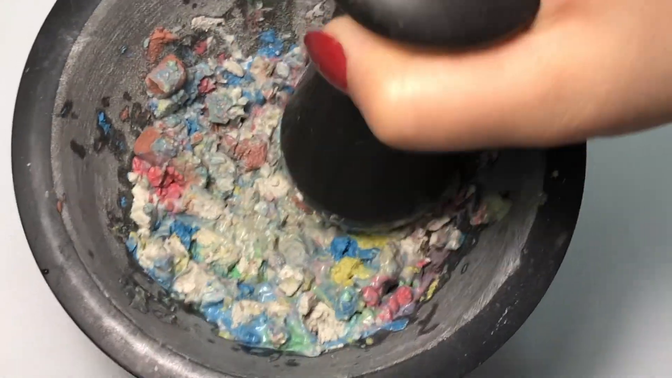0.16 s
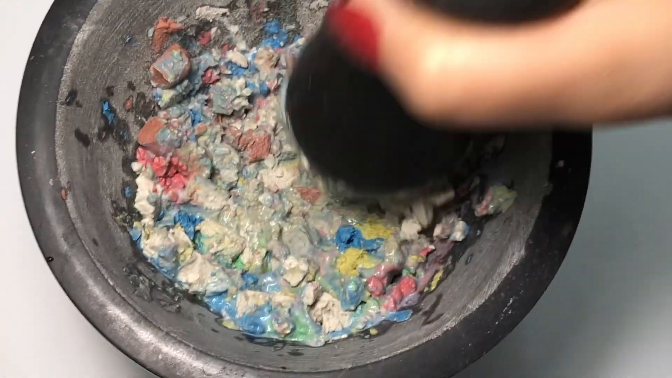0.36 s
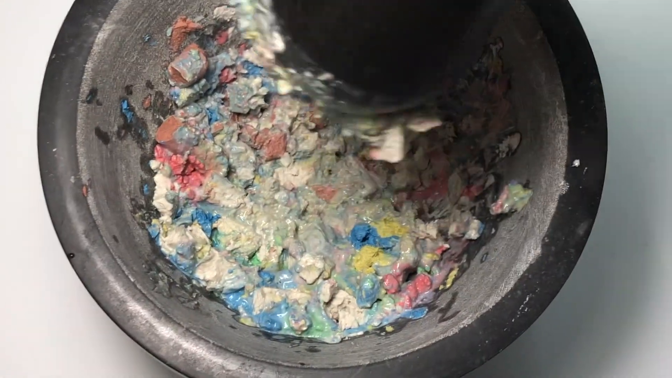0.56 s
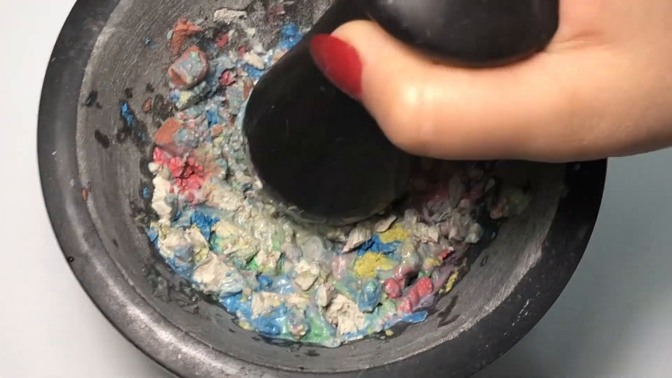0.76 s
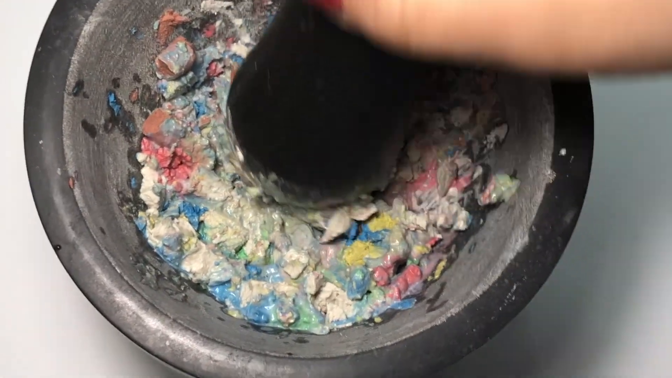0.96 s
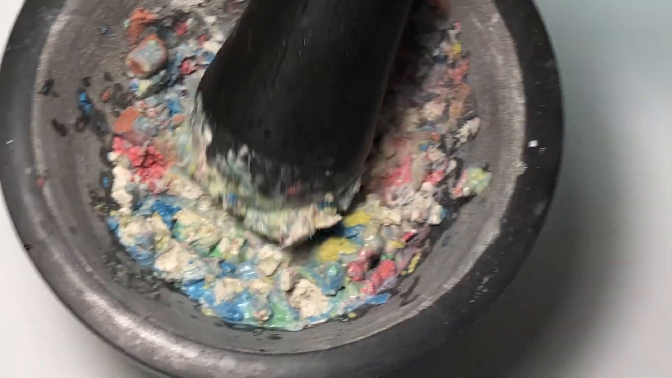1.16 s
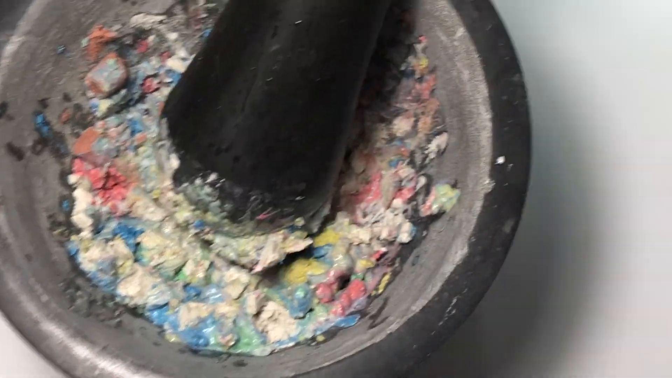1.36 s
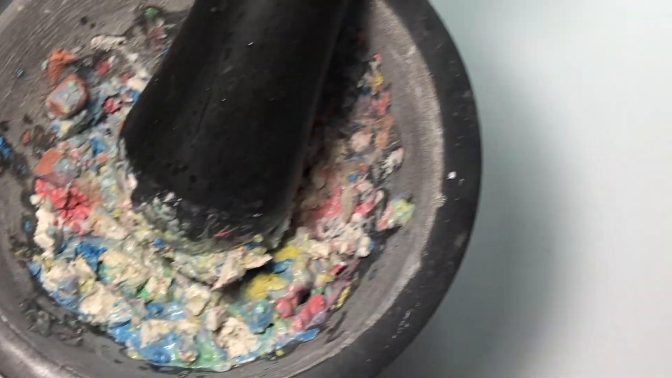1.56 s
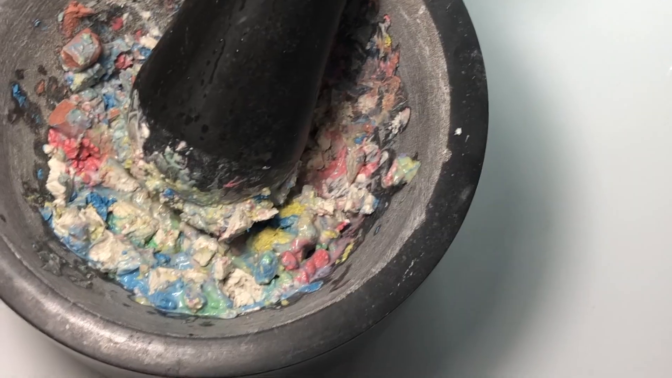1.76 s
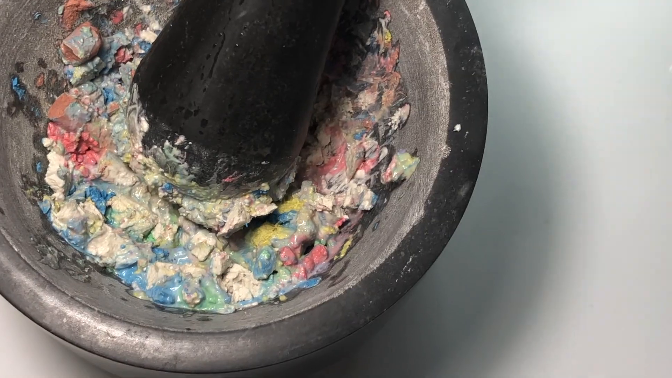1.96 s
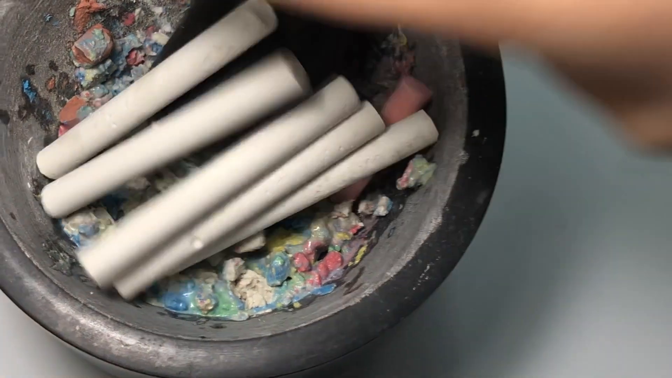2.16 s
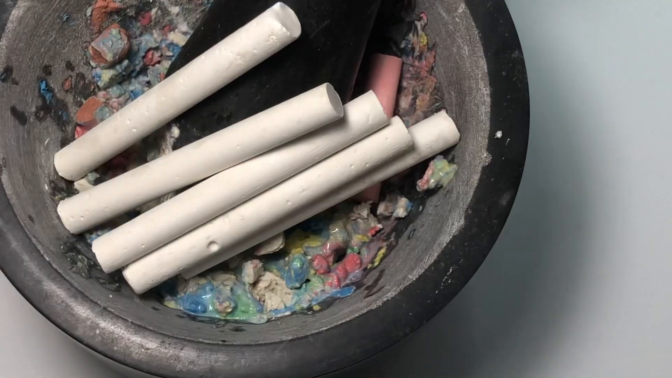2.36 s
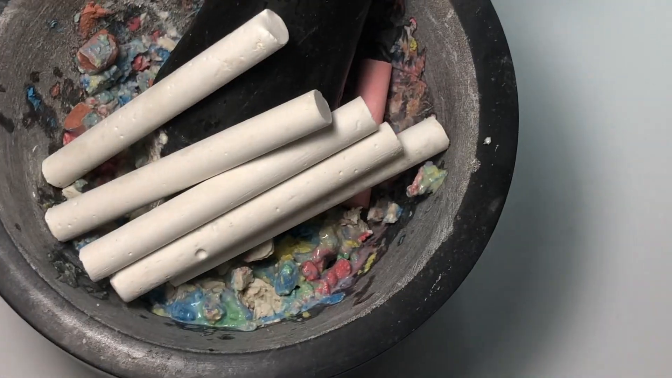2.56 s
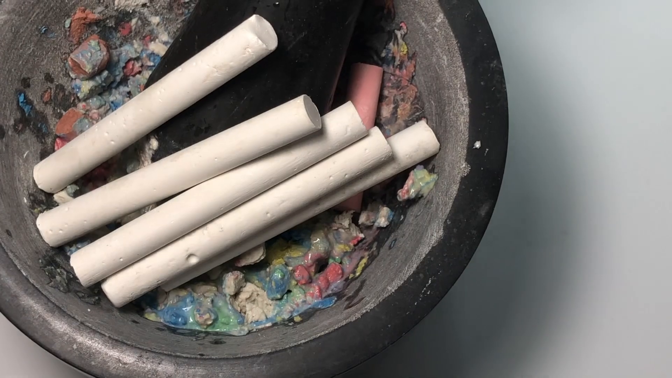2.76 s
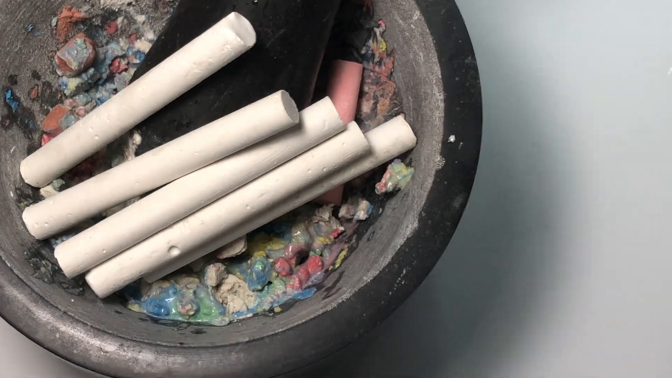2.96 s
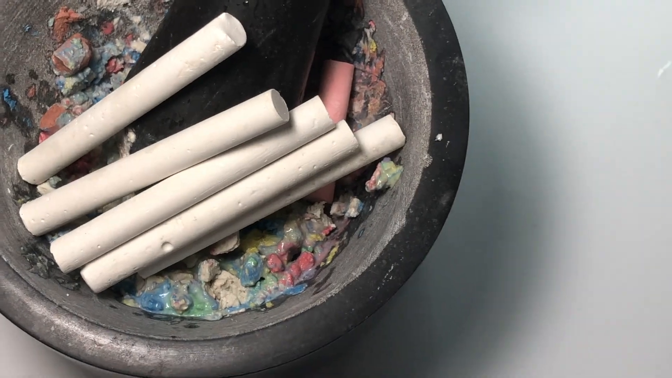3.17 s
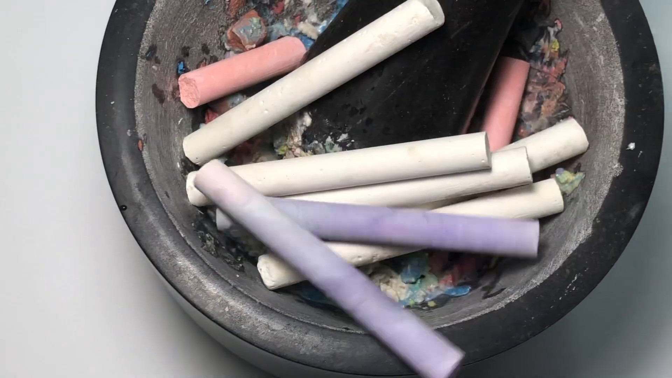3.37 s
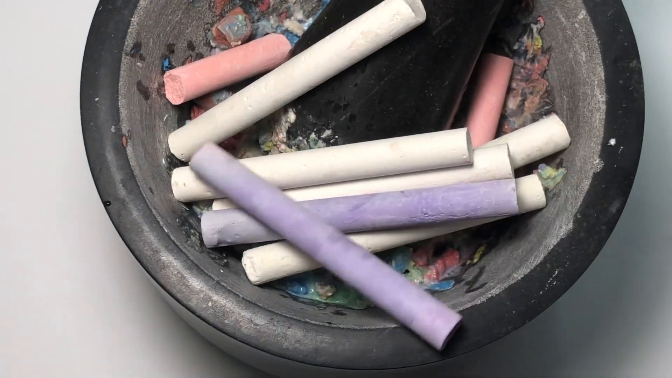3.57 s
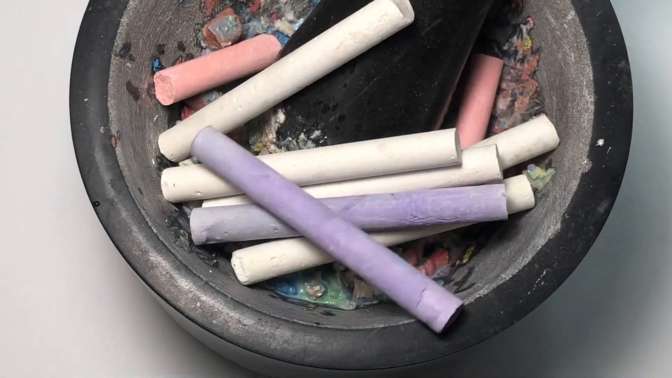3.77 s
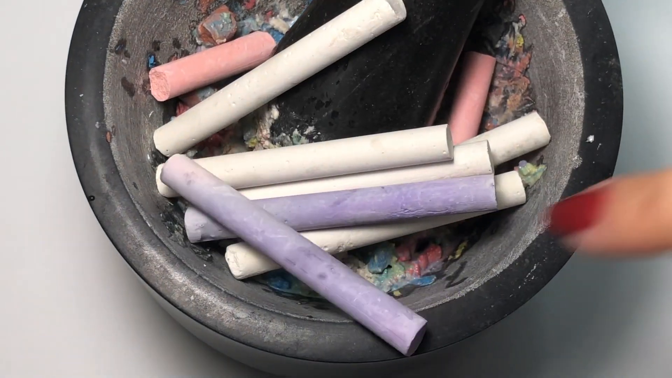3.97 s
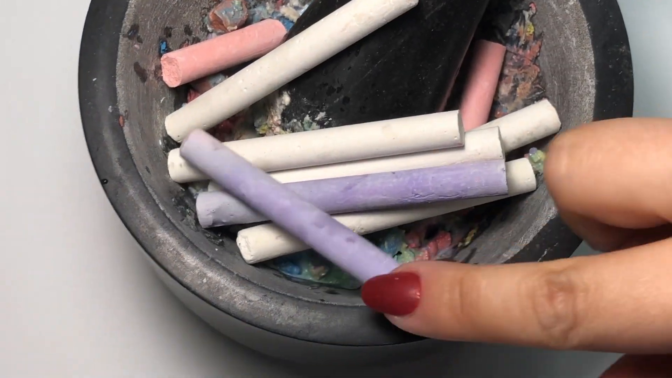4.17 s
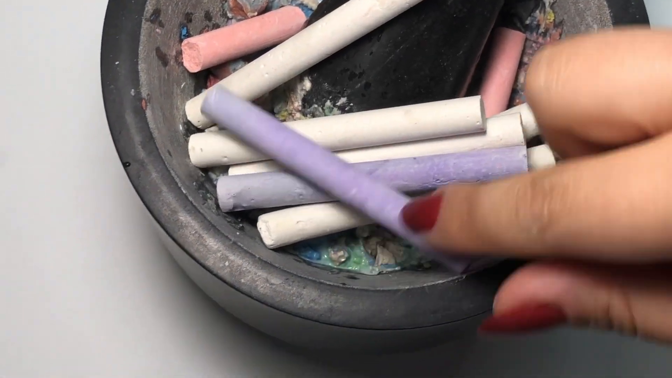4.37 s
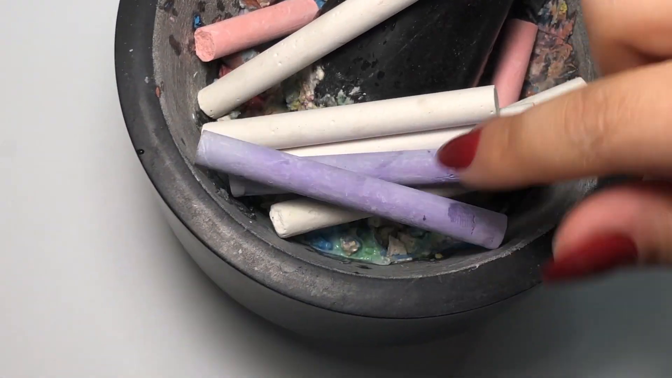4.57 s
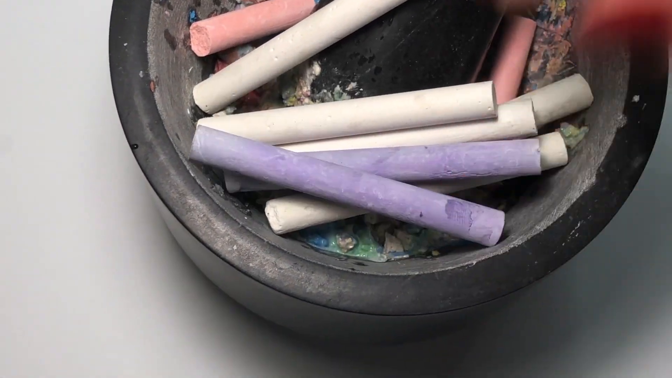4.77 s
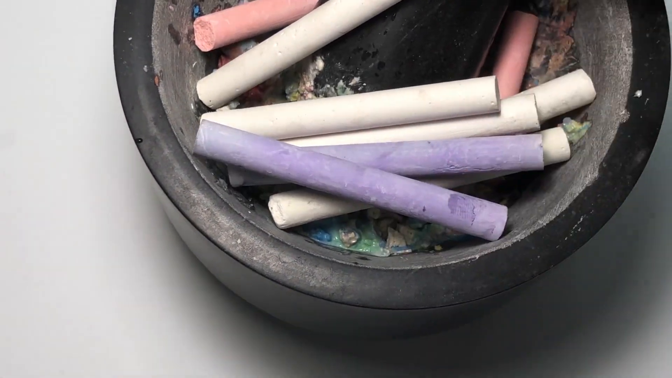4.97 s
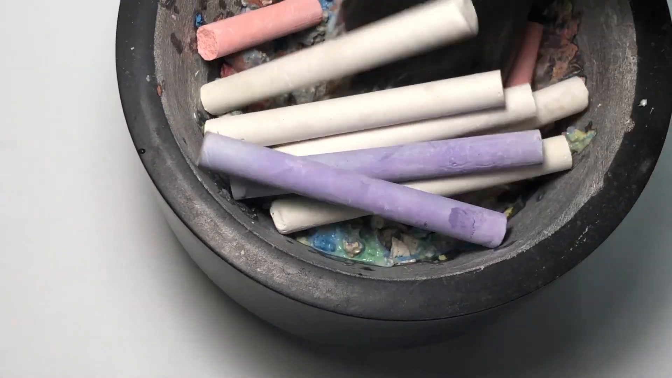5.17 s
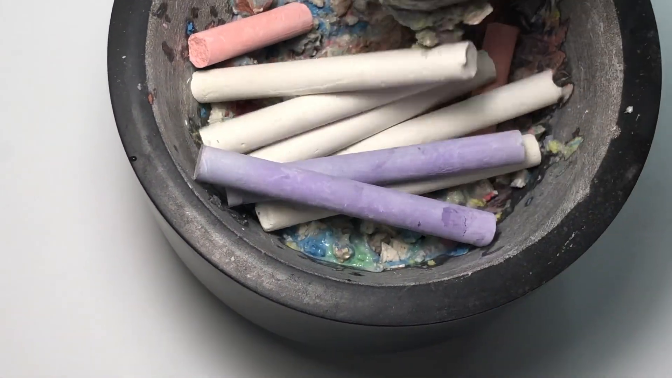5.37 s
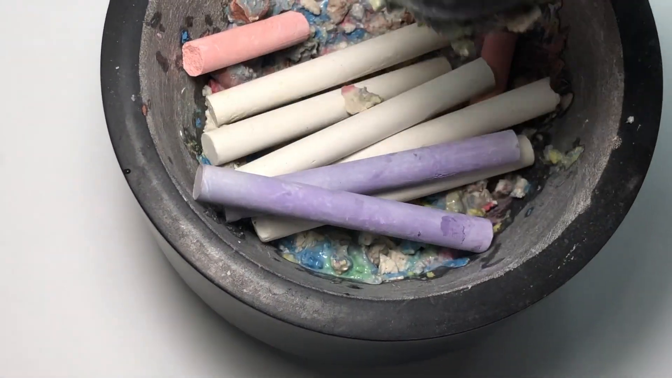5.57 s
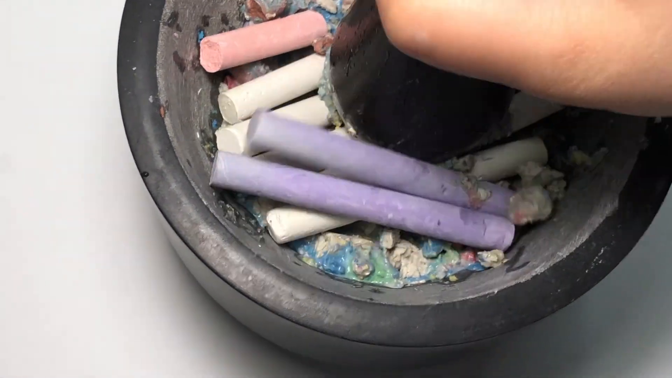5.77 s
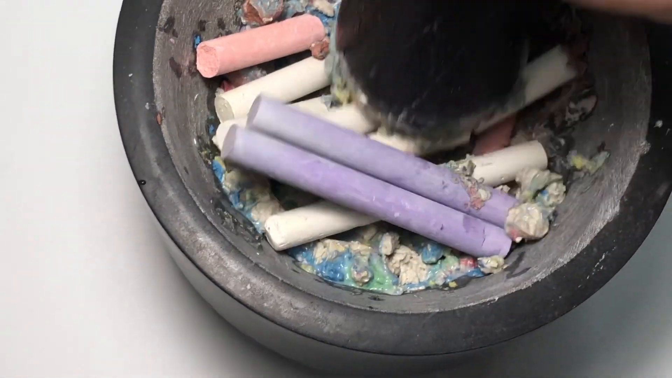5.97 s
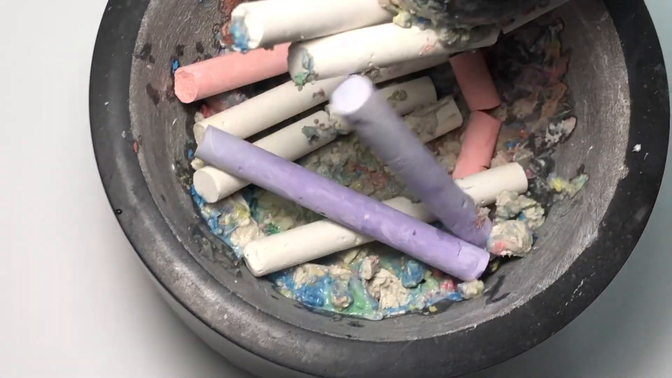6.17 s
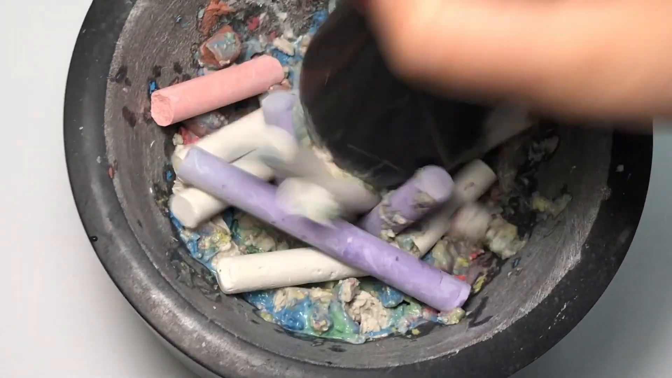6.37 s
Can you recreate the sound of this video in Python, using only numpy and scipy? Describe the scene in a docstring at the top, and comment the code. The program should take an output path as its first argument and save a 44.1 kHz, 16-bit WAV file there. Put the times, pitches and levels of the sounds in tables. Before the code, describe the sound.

Booming pestle blows with chalk crunch, a ringing stone bounce, a quiet spell of clinking and sliding chalk sticks, then two heavy crunching blows.

```python
"""A booming blow, then another: a stone pestle pounds chalk in a stone mortar on a table, close by in
a small room. The blows sway and knock the table as decaying modes; chalk cracks as bursts of grains.
The third blow lands on bare stone and bounces, and the stone modes ring. Fresh sticks drop in, clink
as free bars and slide as filtered friction noise, and are pounded in turn. Air and a low rumble lie beneath."""
import sys
import numpy as np
from scipy import signal
from scipy.fft import rfft, irfft
from scipy.io import wavfile

SR = 44100
rng = np.random.default_rng(int(sys.argv[2]) if len(sys.argv) > 2 else 0)


def put_to_file(sound):
    """Save the sound as 16-bit audio at rate SR, in the file named by the first command-line argument."""
    columns = np.atleast_2d(sound).T  # one column per channel
    safe = np.clip(columns, -1, 1)
    whole_steps = np.round(safe * 32767)
    wavfile.write(sys.argv[1], SR, whole_steps.astype(np.int16))


N = 283563
RING_TIME = np.arange(SR // 3) / SR  # time axis of one struck sound, seconds

# Still air of the place. Each row: frequency in Hz, relative density in dB per Hz.
AIR = [(20, -10.5), (70, -21), (120, -14), (180, -23.5), (400, -25.5), (1000, -32.5), (2500, -37.5),
       (16000, -42.5)]
AIR_DB = -60

# Low rumble: steady level, and a swell round each blow (1/e half width, level against the blow).
RUMBLE_DB, WAFT_S, WAFT_DB = -52, .11, -49.5
# A gentle bump in the deep bass. Each row: start in seconds, length in seconds, peak level in dB.
BUMPS = [(2.85, .16, -40)]

# Pestle blows. Each row: start in seconds, relative level in dB, contact time in seconds,
# level of the higher table modes against the blow in dB.
BLOWS = [(.0880, 0, 0.0027, 5.5), (0.6864, 2, 0.0032, -2), (1.094, -3, 0.0031, 8.5),
         (5.7059, 7, 0.0071, 5.5), (6.3797, 4, 0.0045, 8.5)]
# The table's main sway: settled pitch, decay, and time to build.
BOOM_HZ, BOOM_T60_S, BOOM_SWELL_S = 121.18, 0.15, .042
# Higher modes of the table. Each row: frequency in Hz, relative level in dB, t60 in seconds.
TABLE_MODES = [(62.6, -23, 0.067), (187.3, -16.5, 0.078), (227.6, -12.5, 0.12), (277.5, -20.5, 0.14),
               (315, -17, 0.12), (401, -9.5, .075), (445, -11, 0.049), (489, -25.5, 0.3), (582, -23, 0.15),
               (661, -21.5, 0.15), (830, -26, 0.26)]
# Chalk or a stick pitched here moves the table at its listed level; lower pieces are heavier, move it more.
LANDING_HZ = 1913
# Blurred small modes of table and bowl. Each row: frequency in Hz, relative density in dB per Hz.
THUMP = [(150, -12), (230, -6), (400, -4.5), (600, -7), (900, -9), (1300, -12.5), (2200, -21), (6000, -45)]

# Chalk cracking under the pestle. Each row: start in seconds, relative level in dB, fragment pitch in Hz.
CRACKS = [(.0885, -31, 6760), (.0920, -14.5, 4060), (.0965, -30, 4460), (.6835, -31, 2890),
          (.6878, -12, 3700), (.6906, -16.5, 8540), (.6975, -18, 1160), (5.6907, -25, 3000),
          (5.6972, -7, 3350), (5.7032, -7, 5200), (5.7062, -1.5, 6140), (5.7132, -20.5, 5770),
          (6.3548, -11.5, 7530), (6.3607, -38, 9000), (6.3648, -7, 8300), (6.3723, -6.5, 5000),
          (6.3812, -10, 3660)]
# Decay of every crack, and the share (0-1) that rings at the fragment's pitch.
CRACK_T60_S, CRACK_RINGS = 0.019, .55
# Clearest ticks of crumbs and chips. Each row: start in seconds, relative level in dB, fragment pitch in Hz.
CRUMBS = [(.2445, -43, 5640), (.287, -41, 3500), (.3065, -32, 4200), (.3375, -35.5, 9000),
          (.874, -43.5, 4600), (.8997, -36, 3800), (.927, -35.5, 5470), (.932, -32.5, 8300),
          (.941, -30.5, 4900), (.9735, -30.5, 3870), (2.838, -48, 1470), (2.878, -36, 1410),
          (5.298, -43, 1790), (5.8188, -29, 4700), (5.935, -43.5, 3200), (6.286, -44, 1750)]
CRUMB_T60_S, CRUMB_RINGS = 0.011, 0.53
# Finer crumbs shed as the pestle lifts: wait after the blow, length, loudest level, middle pitch.
LIFT_AFTER_S, SHED_S, SHED_DB, SHED_HZ = 0.2, 0.2, -47.5, 4900
# Crushed chalk. Each row: frequency in Hz, relative density in dB per Hz.
CRUNCH = [(200, 0), (600, -3.5), (1000, -4), (1350, 6), (2300, -5), (4500, -3.5), (7500, -3.5), (9500, -10),
          (15500, -21.5)]
# Small, hard contacts. Each row: frequency in Hz, relative density in dB per Hz.
CONTACT = [(200, -19), (700, -18), (1050, -7.5), (1300, 4.5), (2400, -3), (4500, -2.5), (7500, -5),
           (10000, -9), (15500, -17.5)]

# Dry scraping: the pestle scrapes at first, later chalk slides on chalk. Each row: start in seconds, length in
# seconds, relative peak level in dB.
SLIDES = [(.93, 0.42, -61.5), (1.68, 0.46, -67.5), (1.97, 0.071, -56.5), (2.83, 0.044, -55.5),
          (2.87, 0.091, -49.5), (2.97, 0.31, -53.5), (4.31, 0.14, -58.5), (5.06, 0.17, -51.5),
          (5.97, 0.12, -61.5)]
# A stick rolling over the others. Each row: start in seconds, length in seconds, peak level in dB.
ROLLS = [(3.38, 0.57, -65.5)]
STROKE_SKEW = 0.68  # below 1, a stroke peaks before its middle
# Sliding friction. Each row: frequency in Hz, relative density in dB per Hz.
RUB = [(400, -17), (900, -3), (1400, 4.5), (2300, -1.5), (3300, 1), (6000, -1.5), (9500, -7.5),
       (15000, -18)]
# Rolling. Each row: frequency in Hz, relative density in dB per Hz.
ROLL = [(150, -19), (330, 0.5), (700, -4), (1100, -21), (3000, -32), (10000, -32)]

# Pestle bouncing on bare stone. Each row: start in seconds, relative level in dB.
STONE_HITS = [(1.0955, 0), (1.1014, -5), (1.1081, -2), (1.1136, -10), (1.1172, -15)]
# Modes of mortar and pestle. Each row: frequency in Hz, relative level in dB, t60 in seconds.
STONE_MODES = [(1034, -22, 0.08), (1240, -18.5, .07), (1397, -13, 0.078), (1500, -16, 0.057),
               (1632, -16, .09), (1814, -18, 0.08), (1967, -15.5, 0.054), (2053, -14, .045),
               (2270, -20.5, .1), (2394, -18, .07), (2676, -27.5, .1), (4789, -17, 0.14),
               (8398, -30.5, 0.065)]
# The bowl jolts on the table at each bounce.
JOLT_HZ, JOLT_T60_S = 398, .08

# Sticks clinking, and a few chips of chalk ticking with a brief ring (3.449 s, 5.361 s). Each row: start in
# seconds, relative level in dB, lowest bending mode in Hz, # overtone level against that mode in dB, t60 in
# seconds.
CLINKS = [(2.011, -35.5, 2860, -2, 0.082), (2.074, -27, 2850, 7, 0.16), (2.0863, -15.5, 2690, 23, 0.075),
          (2.091, -10, 2790, 12.5, 0.087), (2.114, -13.5, 2532, 27, 0.082), (2.168, -20, 2870, 10, 0.037),
          (2.1998, -20.5, 2877, 6.5, 0.094), (2.226, -29, 2770, 0, 0.029), (3.388, -34, 1987, 5.5, 0.032),
          (3.436, -42, 2268, -12, .1), (3.449, -31.5, 2087, 2, 0.0087), (4.5243, -22, 2244, 9, 0.04),
          (5.2089, -15.5, 2640, -1, .08), (5.311, -31, 2720, 0, .045), (5.361, -31, 2800, 6, .008),
          (5.398, -31, 2800, 12.5, .035), (5.4908, -21.5, 2610, -5, .075), (6.1005, -28, 2316, 14, .045),
          (6.195, -42, 2255, -1.5, 0.021), (6.308, -31, 1953, -4.5, 0.032)]
# Bending modes of a stick. Each row: ratio to the lowest mode, exponent of flattening with pitch.
BAR = [(1, 0), (2.618, .15), (4.81, .1)]
BAR_HZ = 2616  # the ratios hold for a stick of this pitch
# A stick falls back and touches once more: longest wait, level against the first touch.
REBOUND_S, REBOUND_DB = 0.022, -19.5
# The dropped handful: start, strongest level, time at full strength, time to settle, change while settling.
DROP_S, DROP_DB, DROP_HOLD_S, SETTLE_S, SETTLE_DB = 2.092, -11.5, .035, .09, -27
# Range of the lowest mode among the sticks of the handful.
SHORTEST_HZ, LONGEST_HZ = 2980, 2550
# Dull knocks of chalk landing and being handled. Each row: start in seconds, relative level in dB, pitch in Hz.
KNOCKS = [(2.098, -27.5, 1534), (2.122, -26, 1700), (2.153, -28.5, 1540), (3.2972, -31, 1540),
          (3.3033, -14.5, 3130), (3.332, -19, 6700), (3.9798, -28, 4677), (3.9976, -29, 4700)]
KNOCK_T60_S, KNOCK_RINGS = 0.06, 0.46
# Dull knocking. Each row: frequency in Hz, relative density in dB per Hz.
DULL = [(150, -23), (400, 2.5), (800, -6), (1400, 0), (4000, -7.5), (7500, -10), (9500, -18.5),
        (15500, -27)]

# Decay of the small room. Each row: frequency in Hz, t60 in seconds.
ROOM_T60 = [(150, 0.067), (500, 0.31), (1500, 0.2), (4000, .25), (8000, 0.07), (15000, 0.31)]
BOWL_REFLECTS_HZ = 700  # the bowl is small and mainly reflects sound above this
CUTOFF_HZ = 16400


def from_db(db):
    """Decibels to gain."""
    return 10 ** (np.asarray(db) / 20)


def rms_one(x):
    """Scale to rms 1."""
    return x / np.sqrt(np.mean(x ** 2) + 1e-20)


def at_hz(points, hz):
    """Read a table on a log-frequency axis."""
    f, value = np.transpose(points)
    return np.interp(np.log(np.maximum(hz, 1)), np.log(f), value)


def add(track, s, sound):
    """Mix a sound into a track at a time in seconds."""
    start = int(round(s * SR))
    track[start:start + len(sound)] += sound[:N - start]


def noise():
    """White noise as long as one struck sound."""
    return rng.standard_normal(len(RING_TIME))


def fade(t60):
    """A free decay, 60 dB down after t60 seconds."""
    return np.exp(-np.log(1000) * RING_TIME / t60)


def rise(seconds):
    """A smooth onset from 0 towards 1."""
    return 1 - np.exp(-(RING_TIME / seconds) ** 2)


def ring(hz, t60):
    """One struck mode: a dying sine that starts from rest position."""
    return np.sin(2 * np.pi * hz * RING_TIME) * fade(t60)


def butterworth(x, edges_hz, kind):
    """Second-order Butterworth filter."""
    return signal.sosfilt(signal.butter(2, edges_hz, kind, fs=SR, output="sos"), x)


def colour(x, spectrum, size=8192):
    """Causal (minimum-phase) filter with this spectrum; white noise keeps its power."""
    hz = np.arange(size // 2 + 1) * SR / size
    gain = rms_one(from_db(at_hz(spectrum, hz)))
    # folding the cepstrum onto positive times makes the filter minimum-phase
    cepstrum = irfft(np.log(gain))[:size // 2]
    cepstrum[1:] *= 2
    impulse = irfft(np.exp(rfft(cepstrum, size)))
    return signal.fftconvolve(x, impulse)[:len(x)]


def resonate(x, hz, width_hz):
    """A broad two-pole resonance; white noise keeps its power."""
    r = np.exp(-np.pi * width_hz / SR)
    zeros = np.sqrt((1 - r * r) / 2) * np.array([1, 0, -1])
    poles = [1, -2 * r * np.cos(2 * np.pi * hz / SR), r * r]
    return signal.lfilter(zeros, poles, x + 1e-18)


def grains(per_s, spread_db, size):
    """Tiny fractures of uneven strength at random moments; rms 1."""
    sign = rng.choice([-1, 1], size)
    strength = from_db(spread_db * np.minimum(rng.exponential(1, size), 4)) * sign
    happens = rng.random(size) < per_s / SR
    return rms_one(strength * happens)


def bursts(rows, spectrum, t60, share, width, per_s, spread_db):
    """Each event is a dying avalanche of grains, partly ringing at the pitch of its fragment."""
    out = np.zeros(N)
    for s, db, hz in rows:
        burst = grains(per_s, spread_db, size=len(RING_TIME)) * fade(t60)
        ringing = resonate(burst, hz, width * hz)
        add(out, s, from_db(db) * ((1 - share) * burst + share * ringing))
    return colour(out, spectrum)


def swells(rows):
    """Strokes that swell and fade: a level over the whole scene."""
    level, time = np.zeros(N), np.arange(N) / SR
    for s, length, db in rows:
        progress = np.clip((time - s) / length, 0, 1)
        level += from_db(db) * np.sin(np.pi * progress ** STROKE_SKEW)
    return level


def still_air():
    """Steady noise of the quiet place, weighted to the bass."""
    return from_db(AIR_DB) * rms_one(colour(rng.standard_normal(N), AIR))


def rumble():
    """Deep noise that swells round each blow and at a gentle bump."""
    time = np.arange(N) / SR
    wafts = sum(from_db(db + WAFT_DB) * np.exp(-((time - s) / WAFT_S) ** 2) for s, db, *_ in BLOWS)
    low = butterworth(rng.standard_normal(N), [12, 34], "band")
    return (from_db(RUMBLE_DB) + wafts + swells(BUMPS)) * rms_one(low)


def table(boom_db=13.0, first_swing=0.15, sag=0.14, sag_s=0.01, nudge_db=-7.5):
    """The mortar drives the table into a sway and higher modes; a longer contact mutes the higher modes."""
    boom, knock = np.zeros(N), np.zeros(N)
    # the sway starts flat under the weight of the blow, and builds as the whole top joins in
    pitch = BOOM_HZ * (1 - sag * np.exp(-RING_TIME / sag_s))
    swell = first_swing + (1 - first_swing) * rise(BOOM_SWELL_S)
    sway = -swell * fade(BOOM_T60_S) * np.sin(2 * np.pi * np.cumsum(pitch) / SR)
    for s, db, contact, upper_db in BLOWS:
        add(boom, s, from_db(db + boom_db) * rise(contact) * sway)
        for k, (hz, mode_db, t60) in enumerate(TABLE_MODES):
            softness = 1 / np.sqrt(1 + (hz * contact) ** 4)
            height = (-1) ** k * from_db(db + upper_db + mode_db) * softness
            add(knock, s, height * rise(contact) * ring(hz, t60))
    # even a falling stick nudges the table
    for s, db, hz, *_ in CLINKS + KNOCKS:
        add(boom, s, from_db(db + nudge_db) * LANDING_HZ / hz * sway)
    return boom, knock


def thump(thump_db=-14.0, thump_t60=0.073, contact_s=0.0033, landing_db=-16.0):
    """Many small modes of table and bowl blur into a short, dull noise; a hard contact drives them most."""
    out = np.zeros(N)
    for s, db, contact, upper_db in BLOWS:
        force = from_db(db + upper_db + thump_db) / np.hypot(1, contact / contact_s) ** 2
        add(out, s, force * noise() * rise(contact) * fade(thump_t60))
    # landing chalk thumps lightly
    for s, db, hz in KNOCKS:
        force = from_db(db + landing_db) * (LANDING_HZ / hz) ** 2
        add(out, s, force * noise() * rise(contact_s) * fade(thump_t60))
    return colour(out, THUMP)


def shed_crumbs(spread_db=9.0, count=6):
    """Fine crumbs fall as the pestle lifts for a blow that follows within a second; rows as for CRUMBS."""
    lifts = [blow[0] for blow, following in zip(BLOWS, BLOWS[1:]) if following[0] - blow[0] < 1]
    rows = []
    for s in lifts:
        for when, small in rng.random((count, 2)):
            start = s + LIFT_AFTER_S + SHED_S * when
            # smaller crumbs are quieter and higher
            rows.append((start, SHED_DB - spread_db * small, SHED_HZ * 2 ** (small - .5)))
    return rows


def crushing(powder_db=-35.0, powder_t60=0.19):
    """Chalk cracks, the powder grinds on briefly under the pestle, and crumbs fall as it lifts."""
    cracks = bursts(CRACKS, CRUNCH, CRACK_T60_S, CRACK_RINGS, width=.55, per_s=22000, spread_db=1.6)
    ticks = CRUMBS + shed_crumbs()
    crumbs = bursts(ticks, CONTACT, CRUMB_T60_S, CRUMB_RINGS, width=.5, per_s=28000, spread_db=1.2)
    powder = np.zeros(N)
    for s, db, *_ in BLOWS:
        grit = grains(1500, 4.5, size=len(RING_TIME))
        add(powder, s, from_db(db + powder_db) * grit * fade(powder_t60))
    return cracks + crumbs + colour(powder, CRUNCH)


def sliding(rub_db=-1.5, sing_db=-14.0, sway_db=-4.5, uneven_db=2.5, count=450):
    """Dry friction catches and slips: it hisses, makes sticks sing faintly, stirs the table; rolling is duller."""
    time = np.arange(N) / SR
    catching = np.interp(time, np.linspace(0, time[-1], count), rng.standard_normal(count))
    friction = grains(4000, 3.5, size=N) * from_db(uneven_db * catching)
    song = rms_one(sum(resonate(friction, hz, 160) for hz in (2860, 6100, 7450)))
    sway = rms_one(resonate(resonate(friction, BOOM_HZ, 30), BOOM_HZ, 30))
    hiss = from_db(rub_db) * colour(friction, RUB)
    slide = hiss + from_db(sing_db) * song + from_db(sway_db) * sway
    return swells(SLIDES) * slide + swells(ROLLS) * colour(friction, ROLL)


def bare_stone(clack_db=4.0, clack_hz=1700, clack_t60=0.01, grit_db=-25.5, grit_t60=0.003, jolt_db=-11.5):
    """Stone on stone: each bounce gives a hard, gritty clack and a jolt of the bowl, and both bodies ring."""
    out, grit = np.zeros(N), np.zeros(N)
    for s, db in STONE_HITS:
        clack = from_db(db + clack_db) * ring(clack_hz, clack_t60)
        jolt = from_db(db + jolt_db) * ring(JOLT_HZ, JOLT_T60_S)
        add(out, s, clack - jolt)
        add(grit, s, from_db(db + grit_db) * noise() * fade(grit_t60))
    # the first, hardest contact sets the modes going
    first_s = STONE_HITS[0][0]
    for k, (hz, mode_db, t60) in enumerate(STONE_MODES):
        add(out, first_s, (-1) ** k * from_db(mode_db) * ring(hz, t60))
    return out + colour(grit, CONTACT)


def rebounds():
    """The light second touch after each clink; rows as for CLINKS."""
    waits = REBOUND_S * rng.uniform(.2, 1, len(CLINKS))
    return [(s + wait, db + REBOUND_DB, *stick) for (s, db, *stick), wait in zip(CLINKS, waits)]


def rattle(count=24, overtone_db=9.0, spread_db=10.5, t60=0.045):
    """Many light touches between the dropped sticks, at pitches within their range; rows as for CLINKS."""
    jitter, pitch, weak = rng.random((count, 3)).T
    after = (np.arange(count) + jitter) / count * (DROP_HOLD_S + SETTLE_S)
    settled = np.maximum(after - DROP_HOLD_S, 0) / SETTLE_S
    levels = DROP_DB + SETTLE_DB * settled - spread_db * weak
    stick_hz = LONGEST_HZ + (SHORTEST_HZ - LONGEST_HZ) * pitch
    return [(DROP_S + t, db, hz, overtone_db, t60) for t, db, hz in zip(after, levels, stick_hz)]


def sticks(click_t60=0.0082, click_db=-2.0, knock_db=-1.0, top_mode_db=-14.5, split=.012, twin_db=-12.0,
           free_s=0.048, left_db=-6.5):
    """Sticks ring as free bars, short stubby ones with flatter overtones; contacts click, landings knock."""
    rings, clicks = np.zeros(N), np.zeros(N)
    # a stick rings freely until it drops back onto its neighbours, which muffle it
    muffle = from_db(left_db * rise(free_s))
    for s, db, hz, overtone_db, t60 in CLINKS + rebounds() + rattle():
        # where the stick is struck decides how its modes share the energy
        shares = from_db([0, overtone_db, overtone_db + top_mode_db])
        shares = shares / np.linalg.norm(shares)
        for (ratio, flattening), share in zip(BAR, shares):
            mode_hz = hz * ratio * (BAR_HZ / hz) ** flattening
            # a stick is never quite round: each mode has a twin that beats against it
            twin = ring(mode_hz * (1 + split * rng.normal()), t60 / 2)
            pair = ring(mode_hz, t60) + from_db(twin_db) * twin
            add(rings, s, from_db(db) * share * pair * muffle)
        add(clicks, s, from_db(db + click_db) * noise() * fade(click_t60))
    knocks = bursts(KNOCKS, DULL, KNOCK_T60_S, KNOCK_RINGS, width=.5, per_s=20000, spread_db=1.5)
    return rings + colour(clicks, CONTACT) + from_db(knock_db) * knocks


def room(x, wet_db=-11.0, build_s=.005, near_db=-9.5, near_t60=0.05):
    """Quick reflections from bowl and table top, and a diffuse tail whose decay time varies with pitch."""
    tail, edges = 0, np.geomspace(100, 18000, 11)
    for low, high in zip(edges, edges[1:]):
        band = butterworth(noise(), [low, high], "band")
        tail = tail + band * fade(at_hz(ROOM_T60, np.sqrt(low * high)))
    tail = tail * rise(build_s)
    near = butterworth(noise() * fade(near_t60), BOWL_REFLECTS_HZ, "high")
    # both parts are scaled to unit energy before their levels are set
    echo = from_db(wet_db) * tail / np.linalg.norm(tail) + from_db(near_db) * near / np.linalg.norm(near)
    return signal.fftconvolve(x, echo)[:N]


def scene(boom_send_db=-20.5, stone_db=1.5, stone_send_db=-3.0):
    """All sources close by and their echo in the room, over still air and a low rumble."""
    boom, knock = table()
    stone = from_db(stone_db) * bare_stone()
    close = knock + thump() + crushing() + sticks() + sliding()
    echo = room(close + from_db(boom_send_db) * boom + from_db(stone_send_db) * stone)
    return (boom + stone + close + echo + still_air() + rumble())[None]


def record(dry):
    """The heaviest blows overload the recorder and clip; a steep low-pass then cuts the top."""
    low_pass = signal.ellip(10, .1, 70, CUTOFF_HZ, fs=SR, output="sos")
    return signal.sosfilt(low_pass, np.clip(dry, -1, 1))


dry = scene()
out = record(dry)
put_to_file(out)
```